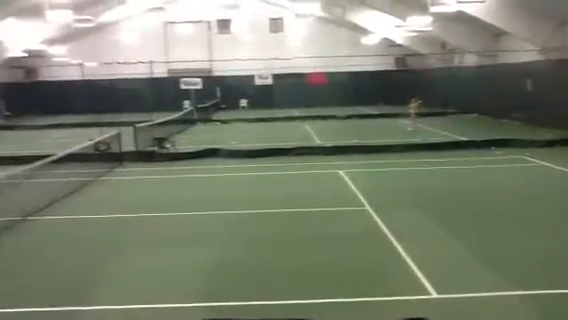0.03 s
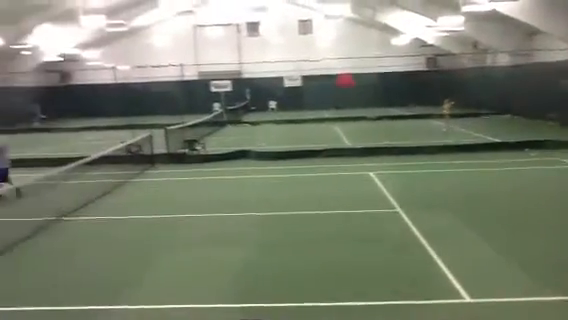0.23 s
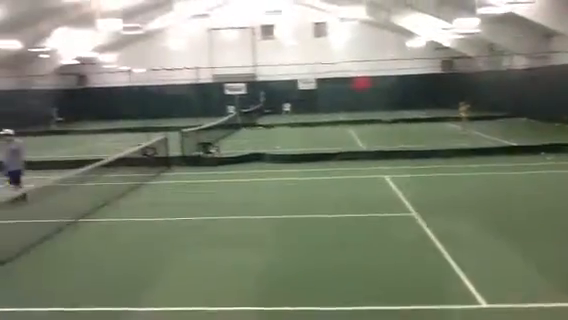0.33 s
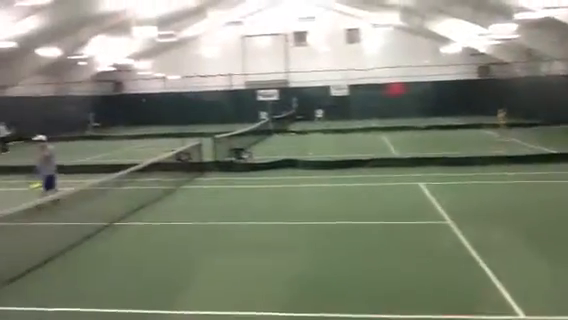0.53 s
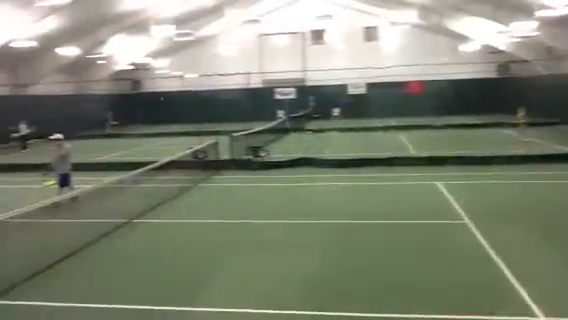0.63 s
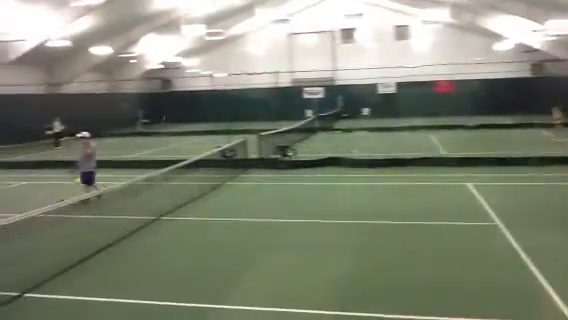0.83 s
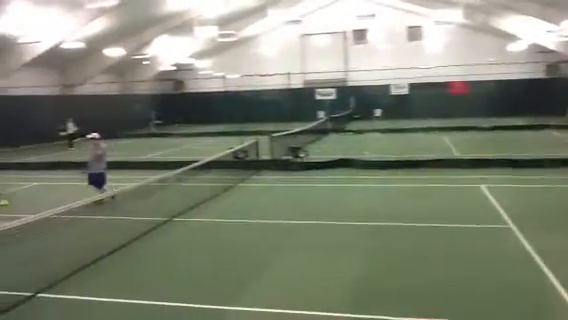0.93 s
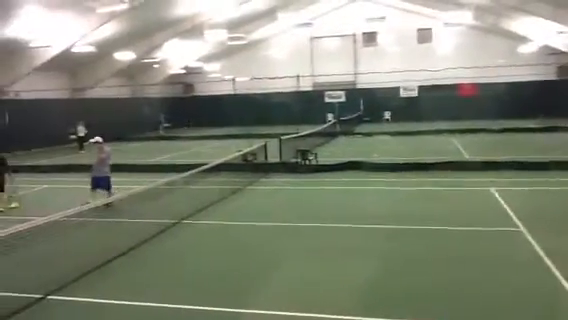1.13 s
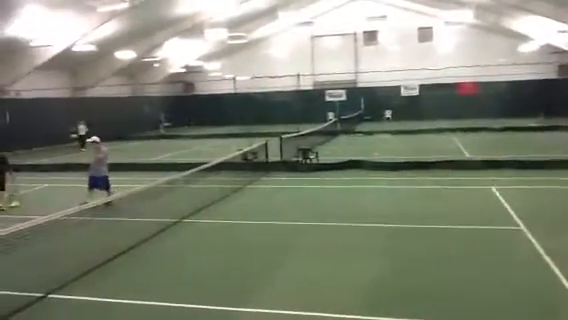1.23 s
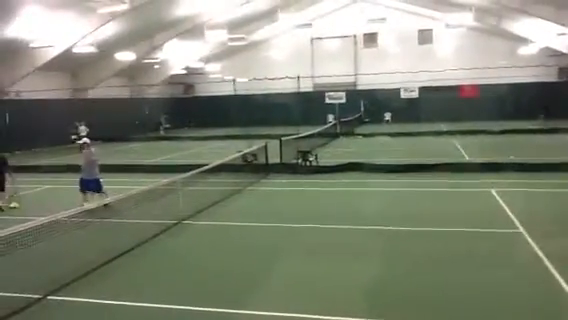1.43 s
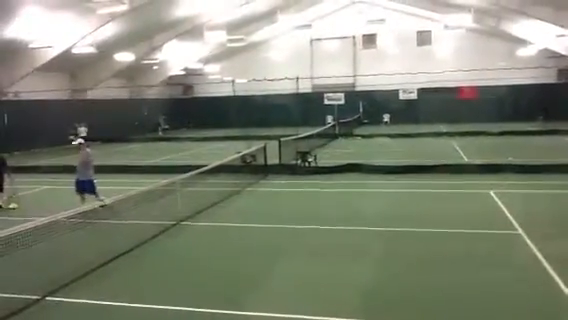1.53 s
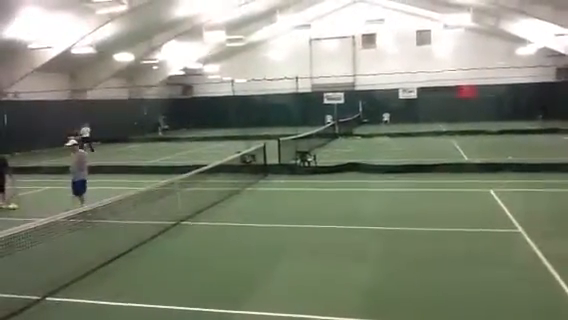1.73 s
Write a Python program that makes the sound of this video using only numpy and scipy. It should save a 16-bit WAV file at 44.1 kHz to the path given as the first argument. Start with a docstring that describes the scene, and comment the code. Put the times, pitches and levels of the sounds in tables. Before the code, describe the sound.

Dull, dry thumps right at a hand-held microphone, probably handling bumps: three stronger knocks with deeper thuds in the first second, then softer thuds thinning out, over lumpy low rumble and hiss in an indoor tennis hall.

```python
"""Dull thumps at a microphone

Dull, dry, quiet low thumps close to a hand-held microphone, perhaps handling bumps.
A strong one is a short knock, a pressure dip sliding down in pitch, most often followed by a deeper thud.
Softer thuds, also low-pitched dips, come in between, with faint ticks and one tiny treble blip.
Behind them lie a rumble of low noise swelling in lumps and the microphone's steady noise hiss."""
import sys
import numpy as np
from scipy import signal
from scipy.fft import rfft, irfft, next_fast_len
from scipy.io import wavfile

SR = 44100
rng = np.random.default_rng(int(sys.argv[2]) if len(sys.argv) > 2 else 0)


def wrap_up_sound(samples):
    """Save the sound to the file named by the first command line argument, as 16-bit audio."""
    columns = np.atleast_2d(samples).T
    # keep every value between -1 and 1, then stretch to whole-number steps
    tamed = np.clip(columns, -1, 1)
    steps = np.round(tamed * 32767).astype(np.int16)
    wavfile.write(sys.argv[1], SR, steps)


N = 79380
TIME_S = np.arange(N) / SR


def amp(db):
    """Amplitude factor of a level in dB."""
    return 10 ** (np.asarray(db) / 20)


def rms_one(x):
    """Scale to rms 1."""
    return x / np.sqrt(np.mean(x ** 2) + 1e-20)


def dip(cycles, spread_cycles):
    """Pressure dip with a rebound on either side: negative cosine under a Gaussian."""
    envelope = np.exp(-.5 * (cycles / spread_cycles) ** 2)
    return -np.cos(2 * np.pi * cycles) * envelope


# Knocks: (time of dip [s], level [dB], pitch at dip [Hz], rise spread [cycles], fade spread [cycles],
#          snap lead [s], snap level [dB], snap pitch [Hz], snap spread [cycles])
KNOCK_TABLE = [(0.2239, -27.5, 194, 0.5, 0.89, 0.0043, -45, 470, .6),
               (0.6508, -38, 244, 0.28, 0.3, 0.0014, -51, 480, 0.4),
               (0.8326, -32.5, 206, .4, 0.39, 0.00162, -48.5, 570, 0.25),
               (1.6524, -42.5, 203, 0.47, 0.74, 0.0021, -57, 454, 0.34)]
KNOCK_FALL_S = .016  # pitch falls by a factor e


def knocks():
    """Dips whose pitch slides down exponentially, each led by a brighter snap of steady pitch."""
    out = np.zeros(N)
    for s, db, hz, rise, fade, lead_s, snap_db, snap_hz, snap_spread in KNOCK_TABLE:
        age = np.clip((TIME_S - s) / KNOCK_FALL_S, -9, 9)
        cycles = hz * KNOCK_FALL_S * (1 - np.exp(-age))  # integral of the falling pitch
        spread = np.where(TIME_S < s, rise, fade)
        late_fade = np.exp(-np.maximum(age, 0) ** 2)
        out += amp(db) * dip(cycles, spread) * late_fade
        snap_cycles = snap_hz * (TIME_S - s + lead_s)
        out -= amp(snap_db) * dip(snap_cycles, snap_spread)  # opposite polarity
    return out


# Thuds: (time of dip [s], level [dB], pitch [Hz], fade spread [cycles])
THUD_TABLE = [(.0520, -52, 141, 0.63), (0.1142, -55, 121, 0.46), (0.1528, -45.5, 128, 0.62),
              (.2340, -26, 111.5, 0.63), (.2930, -56, 171, .5), (.3290, -54.5, 153, 0.88),
              (.3590, -54, 168, 1.34), (0.401, -53, 140, 0.64), (0.428, -52, 148, 1.1),
              (0.485, -52.5, 150, .5), (0.521, -44.5, 153, 0.55), (0.533, -43.5, 121, 0.46),
              (0.57, -50.5, 152, 0.62), (0.5891, -38.5, 133, 0.49), (0.6632, -28.5, 111, 0.49),
              (0.6812, -46.5, 111, 0.32), (.6960, -44.5, 145, 1.07), (.7520, -44, 146, 0.62),
              (.8110, -44, 149, 0.4), (.8460, -29.5, 109.4, 0.46), (0.8965, -47.5, 150, .8),
              (.9045, -49.5, 98, 0.77), (.9440, -58.5, 157, 1.1), (0.9766, -43.5, 157, 0.56),
              (1.013, -55, 100, .6), (1.076, -43, 171, 0.38), (1.097, -42, 144, 0.83),
              (1.13, -42, 170, 0.62), (1.182, -53.5, 170, 0.64), (1.2235, -55, 162, 0.63),
              (1.2450, -57.5, 196, 0.64), (1.2660, -56.5, 158, 1), (1.3890, -48, 146, 0.72),
              (1.4067, -48, 154, 0.58), (1.4628, -54, 151, 0.74), (1.4780, -59.5, 151, 0.77),
              (1.5827, -52, 172, 0.79), (1.711, -58, 110, 0.52)]
THUD_RISE_SHARE = 0.83  # rise spread / fade spread


def thuds():
    """Round low dips of steady pitch that rise quicker than they fade."""
    out = np.zeros(N)
    for s, db, hz, fade in THUD_TABLE:
        spread = fade * np.where(TIME_S < s, THUD_RISE_SHARE, 1)
        out += amp(db) * dip(hz * (TIME_S - s), spread)
    return out


# Faint ticks: (time [s], level [dB], pitch [Hz])
TICK_TABLE = [(.4601, -57, 1100), (.6867, -55, 1500)]
TICK_SPREAD_CYCLES = .25


def ticks():
    """Tiny clicks: dips so narrow that little of the rebound is left."""
    out = np.zeros(N)
    for s, db, hz in TICK_TABLE:
        out += amp(db) * dip(hz * (TIME_S - s), TICK_SPREAD_CYCLES)
    return out


BLIP_S, BLIP_DB, BLIP_HALF_S = .66175, -59, .00105
BLIP_LOW_HZ, BLIP_TOP_HZ = 7100, 15500


def treble_blip():
    """Sine burst whose pitch dives and climbs back along a parabola."""
    u = np.clip((TIME_S - BLIP_S) / BLIP_HALF_S, -2, 2)
    sweep_hz = BLIP_TOP_HZ - BLIP_LOW_HZ
    cycles = BLIP_HALF_S * (BLIP_LOW_HZ * u + sweep_hz * u ** 3 / 3)  # integral of the pitch
    return amp(BLIP_DB) * np.sin(2 * np.pi * cycles) * np.exp(-u ** 10)


def coloured(spectrum):
    """Noise shaped to a (frequency [Hz], density [dB per Hz]) spectrum, rms 1."""
    hz, db = np.transpose(spectrum)
    size = next_fast_len(N)
    f = np.maximum(np.arange(size // 2 + 1) * SR / size, 1)
    gain = amp(np.interp(np.log(f), np.log(hz), db))
    white = rng.standard_normal(size)
    return rms_one(irfft(rfft(white) * gain, size)[:N])


def drift(corner_hz):
    """Slow random curve: noise through a double one-pole low-pass, rms 1."""
    r = np.exp(-2 * np.pi * corner_hz / SR)
    white = rng.standard_normal(N + SR)
    return rms_one(signal.lfilter([1], [1, -2 * r, r * r], white)[SR:])  # first second: settling


# Rumble level: (time [s], level [dB])
RUMBLE_LEVEL_CURVE = [(0, -62.5), (.25, -57.5), (.5, -61.5), (.75, -58.5), (.95, -59.5), (1.15, -62.5),
                      (1.35, -64), (1.55, -67.5), (1.8, -60)]
# Rumble spectrum: (frequency [Hz], relative density [dB per Hz])
RUMBLE_SPECTRUM = [(20, -44.5), (40, -12), (80, -4.5), (147, -4.5), (200, -8.5), (328, -20), (500, -30),
                   (900, -42.5)]
LUMP_RMS_DB, LUMP_CORNER_HZ = 4, 13.5


def rumble():
    """Low noise with a randomly drifting level, heard as lumps, on a slower level curve."""
    s, db = np.transpose(RUMBLE_LEVEL_CURVE)
    noise = coloured(RUMBLE_SPECTRUM)
    lumps = amp(LUMP_RMS_DB * drift(LUMP_CORNER_HZ))
    return amp(np.interp(TIME_S, s, db)) * rms_one(noise * lumps)


def scene():
    """All sources, one channel."""
    return (knocks() + thuds() + ticks() + treble_blip() + rumble())[None]


# Hiss spectrum: (frequency [Hz], relative density [dB per Hz])
HISS_SPECTRUM = [(100, 3.5), (500, 4.5), (1000, 2.5), (2300, 0), (7000, -1), (13000, -0.5), (16000, -3.5)]
HISS_RMS_DB = -68  # before the top cut
MIC_LOW_CUT_HZ, TOP_CUT_HZ = 31, 15290


def record(dry):
    """The microphone loses the deepest bass and adds its hiss; a steep low-pass cuts the top."""
    low_cut = signal.butter(2, MIC_LOW_CUT_HZ, "high", fs=SR, output="sos")
    top_cut = signal.ellip(12, .1, 60, TOP_CUT_HZ, fs=SR, output="sos")
    hiss = amp(HISS_RMS_DB) * coloured(HISS_SPECTRUM)
    return signal.sosfilt(top_cut, signal.sosfilt(low_cut, dry) + hiss)


dry = scene()
out = record(dry)
wrap_up_sound(out)
```